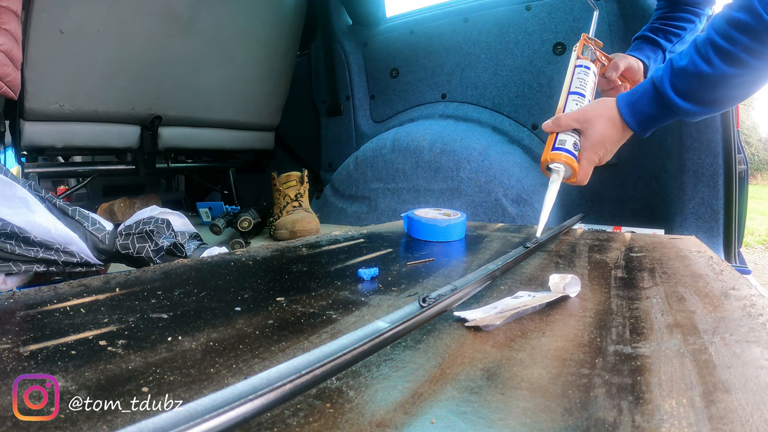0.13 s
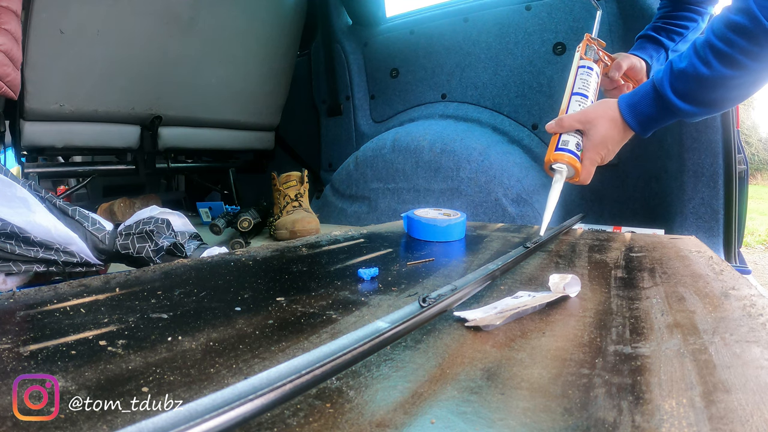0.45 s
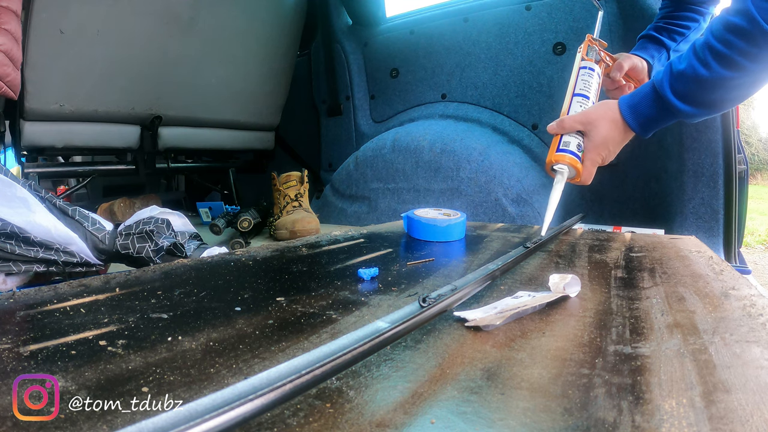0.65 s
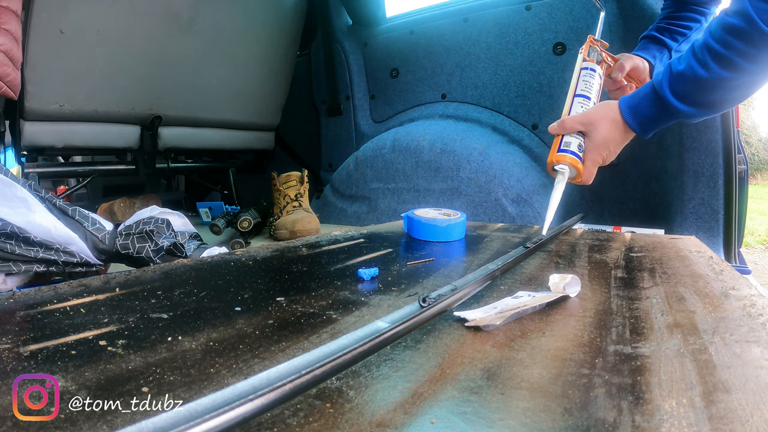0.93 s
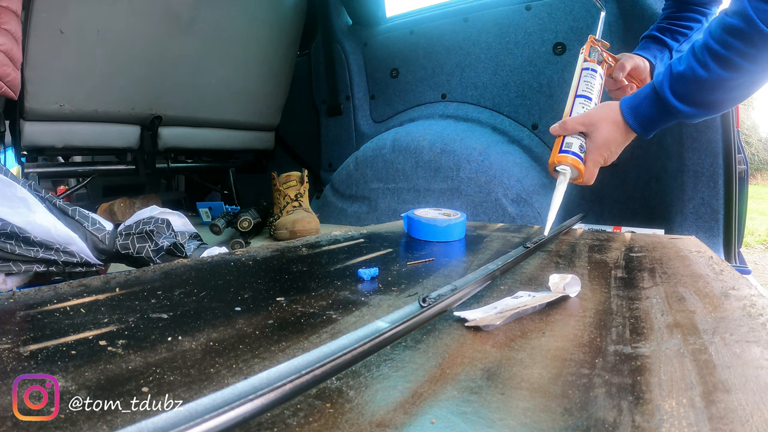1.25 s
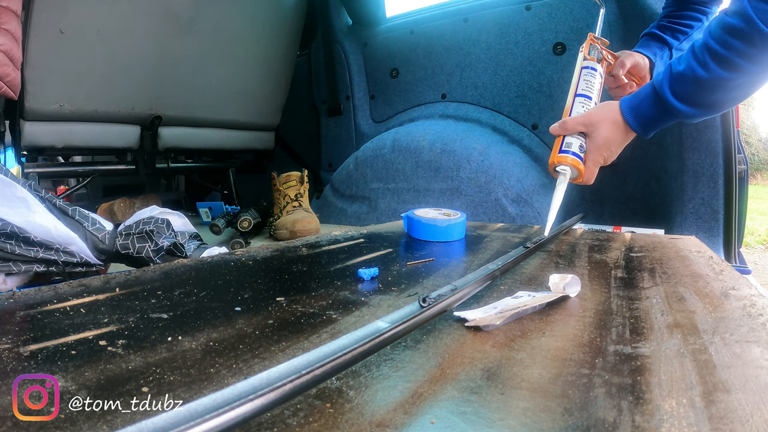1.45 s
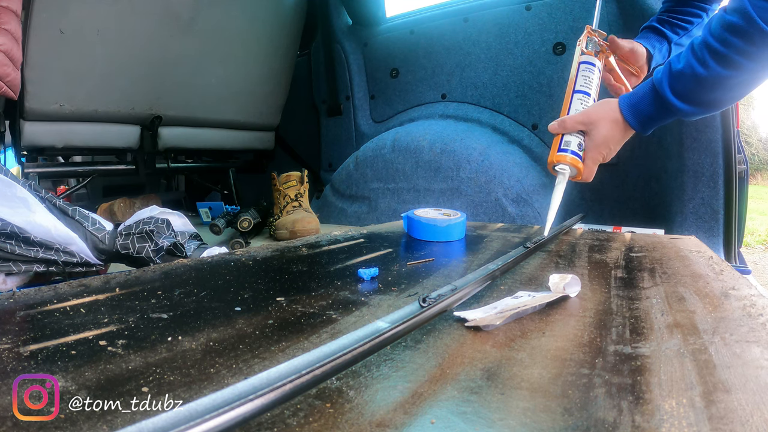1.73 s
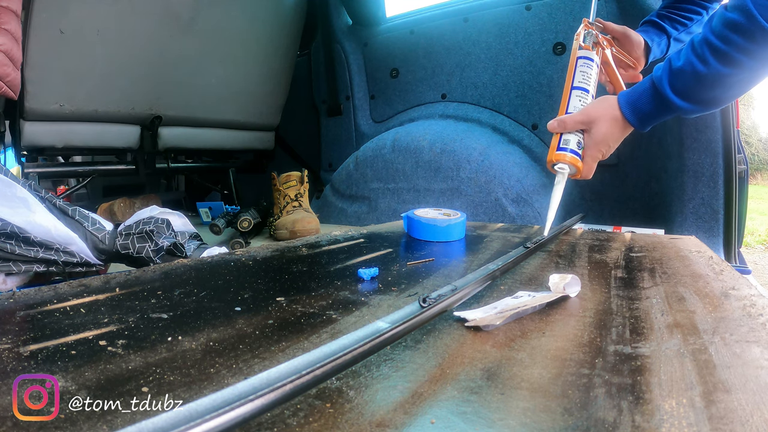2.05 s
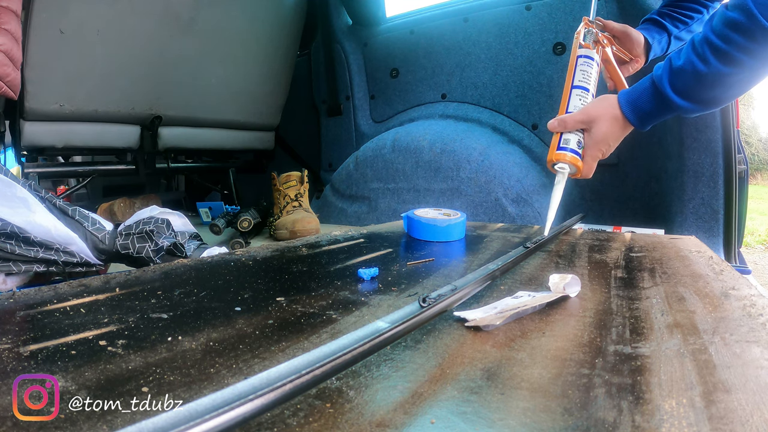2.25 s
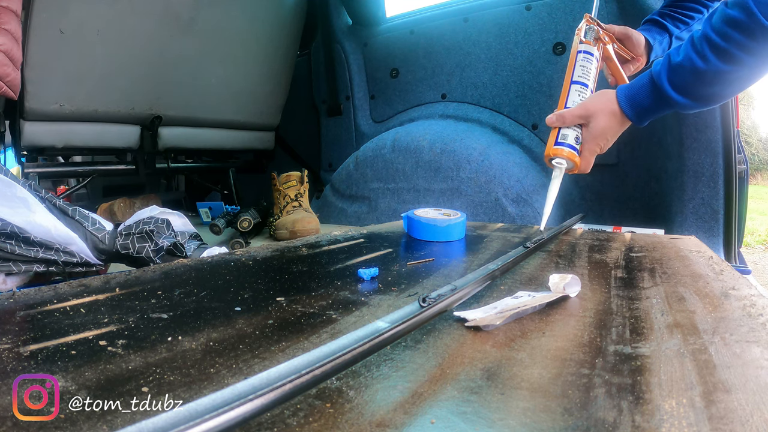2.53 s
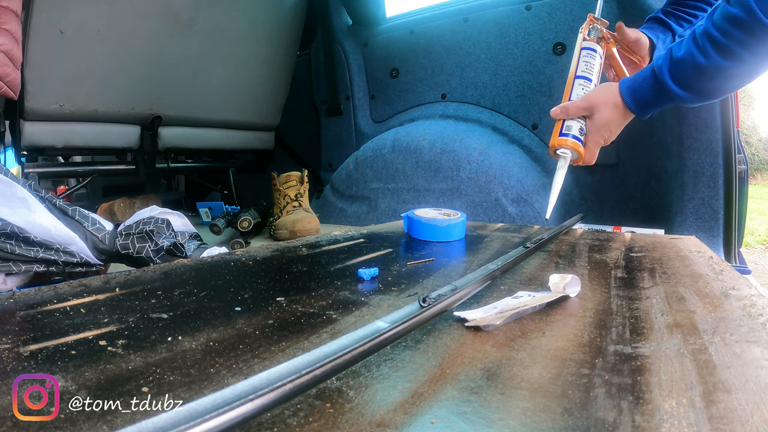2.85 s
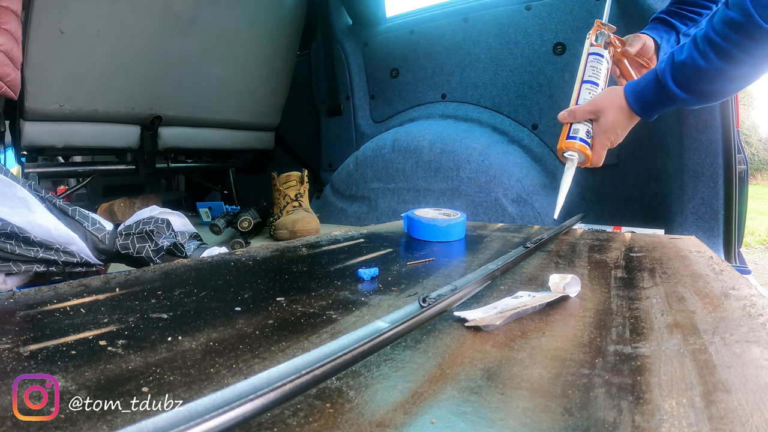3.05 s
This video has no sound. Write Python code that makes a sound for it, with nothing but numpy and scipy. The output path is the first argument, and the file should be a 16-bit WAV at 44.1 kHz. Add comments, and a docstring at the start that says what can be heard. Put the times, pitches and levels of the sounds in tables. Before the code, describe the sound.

A caulking gun's trigger creaks and knocks, then its rod snaps with a loud metallic click.

```python
"""A caulking gun in a parked van: the trigger creaks and knocks, then half a second later the rod
snaps through its catch plate with a loud metallic click. The cabin booms and the panels tremble;
behind lie quiet air, faint ticking and far birds. Metal is shaped noise plus decaying sine modes,
the cabin fading noise; booms, panels and birds are enveloped sines, ticks and air shaped noise."""
import sys
import numpy as np
from scipy import signal
from scipy.fft import rfft, irfft
from scipy.io import wavfile
from scipy.ndimage import uniform_filter1d

SR = 44100
rng = np.random.default_rng(int(sys.argv[2]) if len(sys.argv) > 2 else 0)


def inscribe(sig):
    """Save sig as 16-bit PCM at rate SR to the path in sys.argv[1].

    A 1-D sig is mono; a 2-D sig holds one channel per row.
    Samples are clipped to [-1, 1] before scaling.
    """
    pcm = np.round(np.clip(np.atleast_2d(sig).T, -1, 1) * 32767)
    wavfile.write(sys.argv[1], SR, pcm.astype(np.int16))


N = 141120  # 3.2 s

# spectrum of the trigger knock, also of the rod's slip: f/Hz, relative level/dB
KNOCK_COLOUR = [(60, -7.5), (250, 1.5), (600, -5), (950, -2.5), (1900, -3), (2700, 1.5), (3600, 1.5),
                (4200, -8), (5800, -4), (8000, -13.5), (12000, -17), (16000, -26)]
CRACK_RISE_S = .0005


def amp(db):
    """Decibels to gain."""
    return 10 ** (np.asarray(db) / 20)


def unit(x):
    """Scale to rms 1."""
    return x / np.sqrt(np.mean(x ** 2) + 1e-20)


def read(points, hz):
    """Interpolate a table on a log-frequency axis."""
    f, value = np.transpose(points)
    return np.interp(np.log(hz + 1), np.log(f + 1), value)


def add(mix, start_s, sound):
    """Mix a sound in at start_s, cut at the end of the mix."""
    part = mix[:, round(start_s * SR):][:, :sound.shape[-1]]
    part += sound[..., :part.shape[1]]


def clock():
    """Time axis of one event, in seconds."""
    return np.arange(N) / SR


def sine(cycles):
    """Sine of a phase in cycles."""
    return np.sin(2 * np.pi * cycles)


def noise(colour):
    """Gaussian noise of rms 1, filtered to the given spectrum."""
    gain = amp(read(colour, np.fft.rfftfreq(N, 1 / SR)))
    return unit(irfft(rfft(rng.standard_normal(N)) * gain, N))


def diffuse(colour):
    """Nearly mono noise: common mid plus a weak independent side."""
    side_to_mid_db = -19.5
    mid = noise(colour)
    side = amp(side_to_mid_db) * noise(colour)
    return mid + side * np.array([[1], [-1]])


def ring(modes):
    """Modes set off by one blow: random-phase sines, each decaying exponentially."""
    t = clock()
    total = np.zeros(N)
    for hz, db, t60_s in modes:
        total += amp(db - 60 * t / t60_s) * sine(hz * t + rng.random())
    return np.minimum(t / CRACK_RISE_S, 1) * total


def crack(colour, hold_s, t60_s):
    """Brief chatter of metal on metal: noise with attack, hold and exponential release."""
    t = clock()
    release = amp(-60 * np.maximum(t - hold_s, 0) / t60_s)
    return noise(colour) * np.minimum(t / CRACK_RISE_S, 1) * release


def cabin(colour):
    """Dense reflections in the small lined cabin: the treble dies first, a faint tail lingers."""
    # decay of the reflections: f/Hz, t60/s
    cabin_decay = [(100, .14), (500, .1), (1500, .085), (4000, .07), (8000, .062), (16000, .055)]
    rise_s, late_db, late_t60_s = .002, -39.5, .3
    hz, at_s, bins = signal.stft(diffuse(colour), SR, nperseg=128)
    early = amp(-60 * at_s / read(cabin_decay, hz)[:, None])
    late = amp(late_db - 60 * at_s / late_t60_s)
    faded = signal.istft(bins * (early + late), SR, nperseg=128)[1][:, :N]
    return faded * np.minimum(clock() / rise_s, 1)


def catch_snap():
    """The plunger jolts the cartridge, the rod slips, then it snaps and the steel frame rings."""
    # catch snap: t/s, crack level/dB, cabin level/dB
    snap_event = (2.5354, -6, -13.5)
    # snap spectrum: f/Hz, relative level/dB
    snap_colour = [(60, -16), (400, -16.5), (1000, -15), (1700, -20.5), (2400, -12), (3400, -3),
                   (4100, -2.5), (4800, 1.5), (5600, 1), (8000, -2.5), (10200, 1), (11500, -8),
                   (14300, -3.5), (16000, -14)]
    # steel frame modes: f/Hz, level/dB, t60/s
    frame_modes = [(424, -53.5, .32), (631, -49.5, .22), (1553, -67.5, .8), (2203, -55.5, .45),
                   (3582, -27.5, .05), (4064, -29.5, .06), (4538, -62.5, .5), (4675, -21, .07),
                   (4850, -17.5, .06), (6057, -24.5, .075), (7097, -26.5, .045), (7808, -28, .055),
                   (10360, -22.5, .04), (14330, -29, .045)]
    # cartridge modes: f/Hz, level/dB, t60/s
    cartridge_modes = [(180, -40.5, .07), (310, -36.5, .06), (530, -27.5, .045), (640, -23, .055)]
    jolt_s, jolt_rise_s, slip_db = 2.5313, .003, -38.5
    hold_s, t60_s = .0014, .011
    out = np.zeros((2, N))
    snap_s, crack_db, cabin_db = snap_event
    jolt = ring(cartridge_modes) * np.minimum(clock() / jolt_rise_s, 1)
    slip = amp(slip_db) * crack(KNOCK_COLOUR, snap_s - jolt_s, t60_s)  # held until the snap
    add(out, jolt_s, jolt + slip)
    click = amp(crack_db) * crack(snap_colour, hold_s, t60_s)
    reflections = amp(cabin_db) * cabin(snap_colour)
    add(out, snap_s, click + reflections + ring(frame_modes))
    return out


def trigger_knock():
    """The trigger knocks open: a noise crack, its cabin reflections and the spring's modes."""
    # trigger knock: t/s, crack level/dB, cabin level/dB
    knock_event = (1.9683, -32, -36)
    # spring modes: f/Hz, level/dB, t60/s
    spring_modes = [(268, -45, .2), (556, -64.5, .5), (923, -39.5, .05), (1136, -67, .5), (1525, -71, .6),
                    (1753, -67.5, .45), (2067, -66.5, .55), (2231, -71, .6), (2472, -60.5, .35),
                    (2686, -67, .6), (2796, -35, .045), (3528, -40, .045)]
    hold_s, t60_s = .002, .02
    out = np.zeros((2, N))
    knock_s, crack_db, cabin_db = knock_event
    knock = amp(crack_db) * crack(KNOCK_COLOUR, hold_s, t60_s)
    reflections = amp(cabin_db) * cabin(KNOCK_COLOUR)
    add(out, knock_s, knock + reflections + ring(spring_modes))
    return out


def linkage_creaks():
    """Small creaks of the linkage: noise clicks, each exciting the same few modes."""
    # creaks: t/s, click level/dB, ring gain/dB
    creak_events = [(1.7165, -63.5, -90), (1.723, -65, -85), (1.8015, -66, -75), (1.8315, -76, -64),
                    (1.8365, -61.5, -51), (1.914, -62, -64), (1.938, -62, -53), (1.942, -56, -52),
                    (1.953, -67, -57), (2.343, -70, -67), (2.447, -66.5, -74), (2.812, -74, -64.5),
                    (3.061, -67.5, -64.5)]
    # click spectrum: f/Hz, relative level/dB
    creak_colour = [(200, -10), (1500, 1), (3500, -4), (7000, -3), (11000, -8.5), (16000, -9)]
    # linkage modes: f/Hz, level before ring gain/dB, t60/s
    linkage_modes = [(2950, -8, .06), (3300, -5.5, .06), (3560, -5, .045)]
    t60_s = .035
    out = np.zeros((2, N))
    for start_s, click_db, ring_db in creak_events:
        click = amp(click_db) * crack(creak_colour, 0, t60_s)
        add(out, start_s, click + amp(ring_db) * ring(linkage_modes))
    return out


def cabin_booms():
    """Pushes on the floor swell the cabin's air resonance: low sines that rise and die away."""
    # booms: t/s, f/Hz, peak level/dB, time to peak/s
    boom_events = [(1.615, 133, -51, .03), (1.71, 130, -54, .045), (1.975, 136, -39.5, .028),
                   (2.02, 134, -56.5, .06), (2.17, 120, -54, .045), (2.541, 131, -30, .042),
                   (2.645, 130, -51, .036)]
    shape = 5  # exponent: higher is narrower
    out, t = np.zeros((2, N)), clock()
    for start_s, hz, db, swell_s in boom_events:
        envelope = (t / swell_s * np.exp(1 - t / swell_s)) ** shape
        add(out, start_s, amp(db) * envelope * sine(hz * t))
    return out


def panel_trembles():
    """The same pushes set the panels trembling: very low sines with exponential decay."""
    # trembles: t/s, f/Hz, level/dB, t60/s
    tremble_events = [(1.63, 36, -48, 1.0), (1.97, 35, -53.5, .7), (2.55, 35, -44, 3.2)]
    rise_s = .05
    out, t = np.zeros((2, N)), clock()
    for start_s, hz, db, t60_s in tremble_events:
        envelope = amp(db - 60 * t / t60_s) * np.minimum(t / rise_s, 1)
        add(out, start_s, envelope * sine(hz * t))
    return out


def ticking():
    """Faint dry ticks, about five a second: short decaying noise."""
    # ticks: t/s
    tick_times = [.0675, .2705, .474, .6805, .8835, 1.0895, 1.294, 1.498, 1.701, 1.902, 2.113, 2.318, 2.726,
                  2.936, 3.138]
    # tick spectrum: f/Hz, relative level/dB
    tick_colour = [(300, -20), (900, -9), (1250, 3), (1550, -4.5), (2100, -20), (4000, -13), (5500, -24),
                   (8000, -22), (16000, -33)]
    tick_db, t60_s = -61.5, .03
    out = np.zeros((2, N))
    for start_s in tick_times:
        add(out, start_s, amp(tick_db) * crack(tick_colour, 0, t60_s))
    return out


def birds():
    """Thin, mostly falling whistles from outside: gliding sines with a random waver in pitch."""
    # whistles: t/s, length/s, start f/Hz, end f/Hz, mid-whistle offset/Hz, peak level/dB
    whistle_events = [(.39, .25, 2020, 1480, -70, -77), (.535, .055, 2750, 2250, 2, -75.5),
                      (1.03, .07, 2330, 2330, 220, -68), (1.05, .1, 1270, 1200, -1, -74.5),
                      (1.1, .06, 1680, 1620, 0, -74.5), (1.14, .16, 1920, 1560, 28, -76),
                      (1.2, .17, 1110, 1085, 0.5, -73)]
    waver_rms, waver_window_s = .012, .004  # waver as a fraction of pitch
    out = np.zeros((2, N))
    for start_s, length_s, start_hz, end_hz, arch_hz, db in whistle_events:
        u = np.minimum(clock() / length_s, 1)
        waver = unit(uniform_filter1d(rng.standard_normal(N), round(waver_window_s * SR)))
        glide_hz = start_hz + (end_hz - start_hz) * u + arch_hz * np.sin(np.pi * u)
        hz = glide_hz * (1 + waver_rms * waver)
        envelope = np.sqrt(4 * u * (1 - u))
        add(out, start_s, amp(db) * envelope * sine(np.cumsum(hz) / SR))
    return out


def air():
    """Quiet outdoor rumble and hiss: shaped noise, its level drifting with summed slow sines."""
    # air spectrum: f/Hz, relative density/dB
    air_colour = [(8.8, -27.5), (15, 4.5), (27, -7.5), (53, -9), (70, -14), (226, -20.5), (269, -22.5),
                  (610, -26.5), (1090, -29), (2140, -34.5), (2470, -34), (3220, -37.5), (16000, -44.5)]
    air_db, drift_rms_db = -63, .75
    t = clock()
    drift = np.zeros(N)
    for hz in np.geomspace(.5, 12, 20):
        drift += sine(hz * t + rng.random()) / np.sqrt(hz)
    return amp(air_db + drift_rms_db * unit(drift)) * diffuse(air_colour)


def scene():
    """Everything heard in the van."""
    gun = catch_snap() + trigger_knock() + linkage_creaks()
    van = cabin_booms() + panel_trembles()
    return gun + van + ticking() + birds() + air()


def record(dry):
    """Clip at full scale, then low-pass with a linear-phase FIR."""
    edge_hz = 15950
    held = np.clip(dry, -1, 1)
    taps = signal.firwin(511, edge_hz, window=("kaiser", 9), fs=SR)
    return signal.oaconvolve(held, taps[None], "same")


dry = scene()
out = record(dry)
inscribe(out)
```